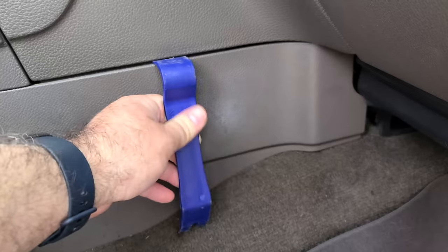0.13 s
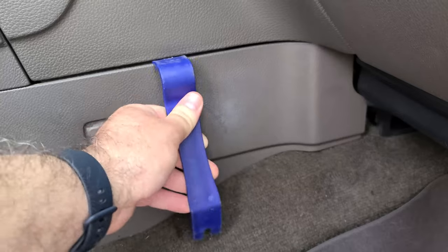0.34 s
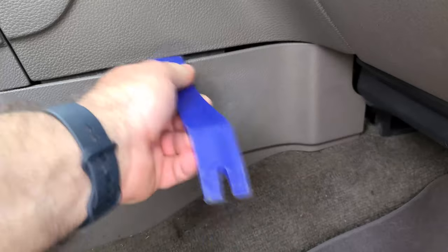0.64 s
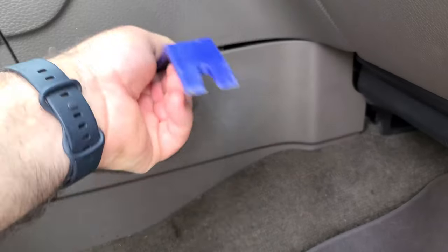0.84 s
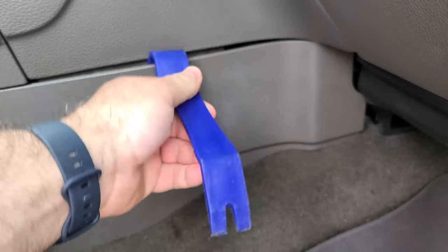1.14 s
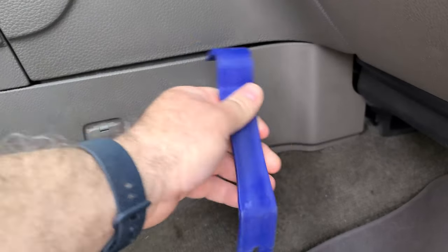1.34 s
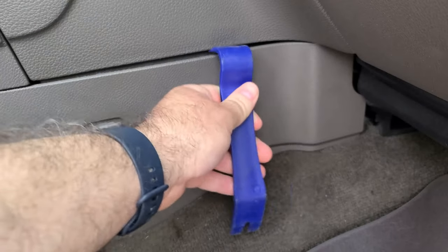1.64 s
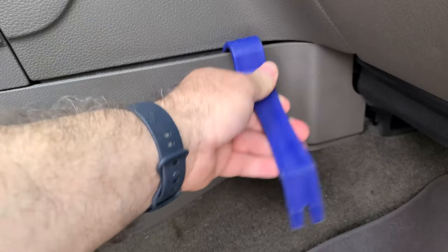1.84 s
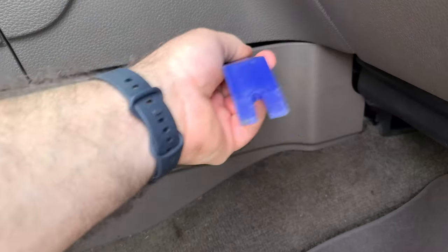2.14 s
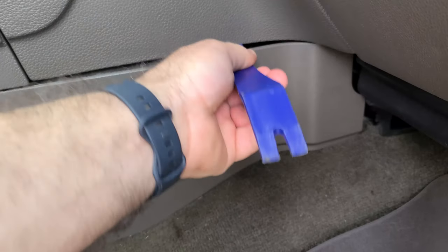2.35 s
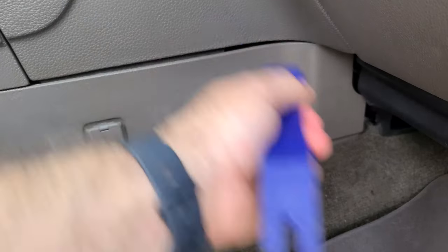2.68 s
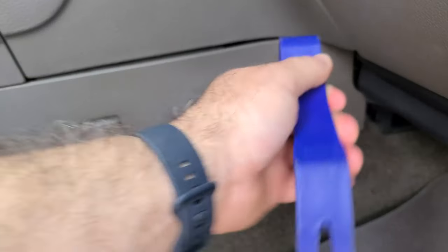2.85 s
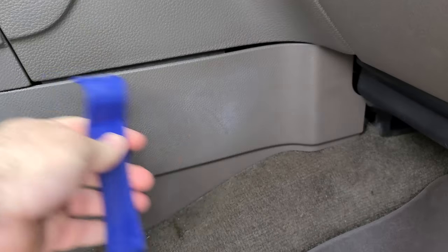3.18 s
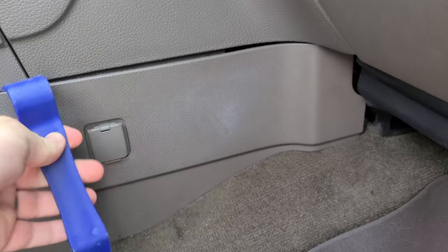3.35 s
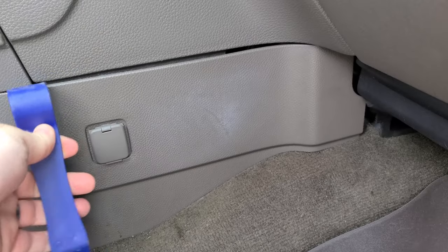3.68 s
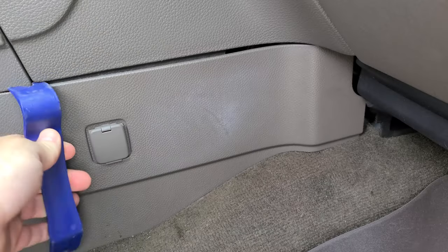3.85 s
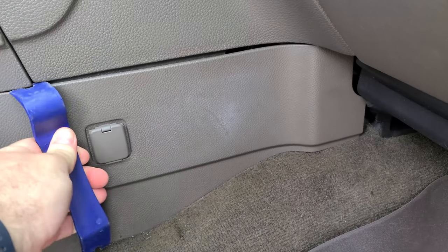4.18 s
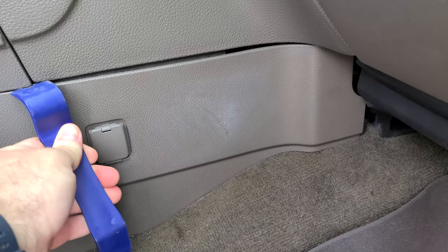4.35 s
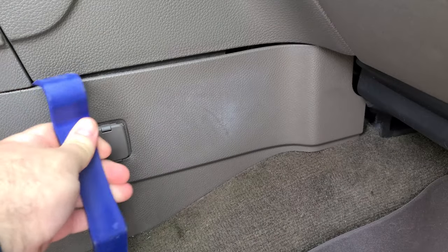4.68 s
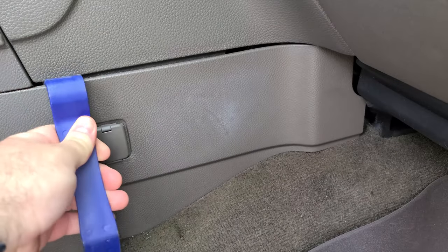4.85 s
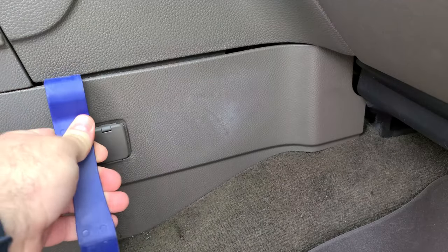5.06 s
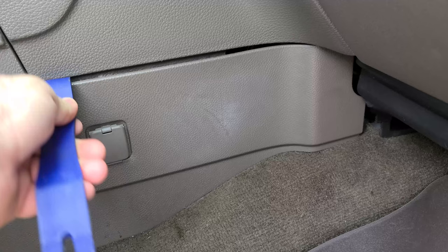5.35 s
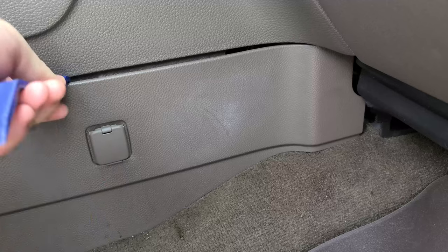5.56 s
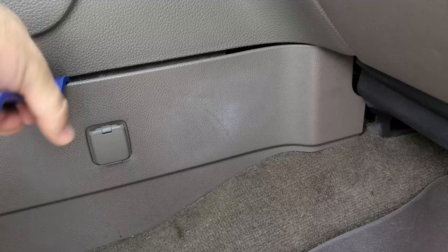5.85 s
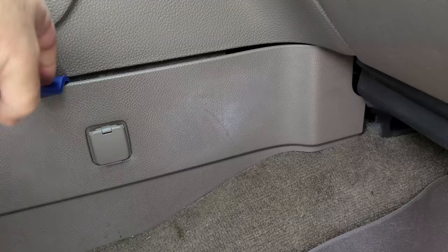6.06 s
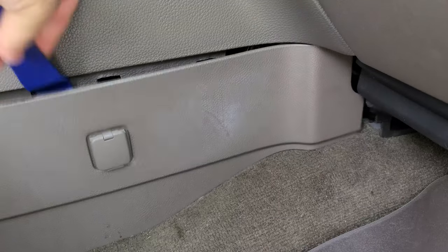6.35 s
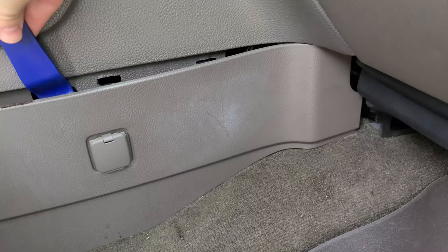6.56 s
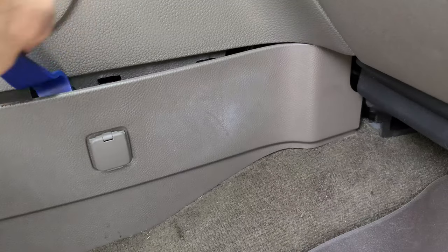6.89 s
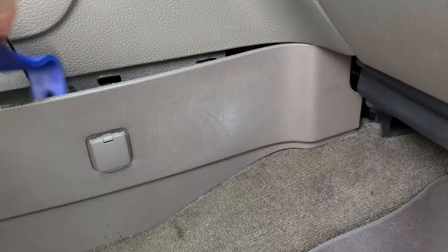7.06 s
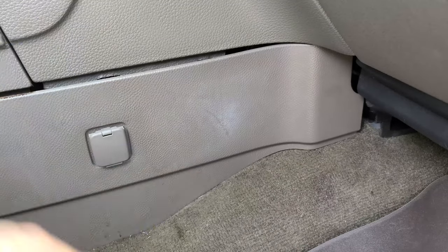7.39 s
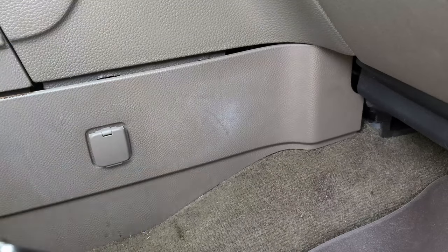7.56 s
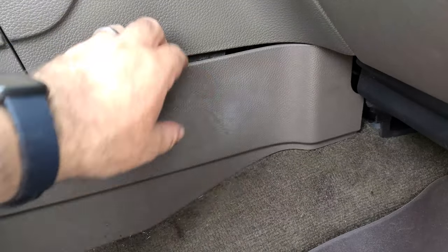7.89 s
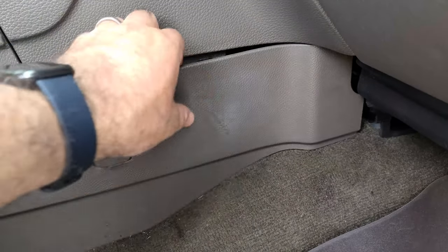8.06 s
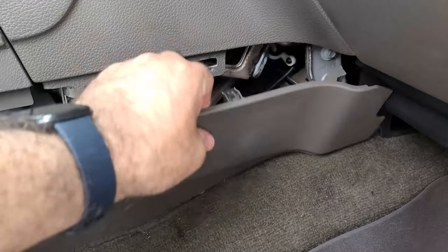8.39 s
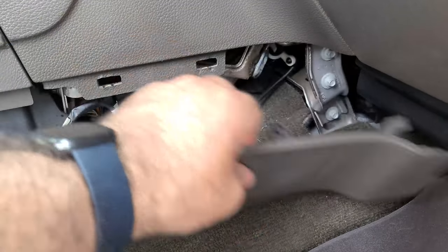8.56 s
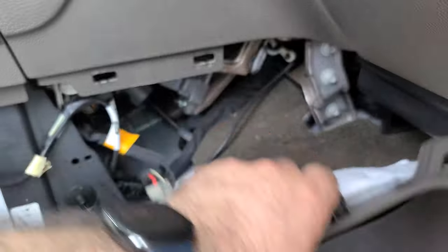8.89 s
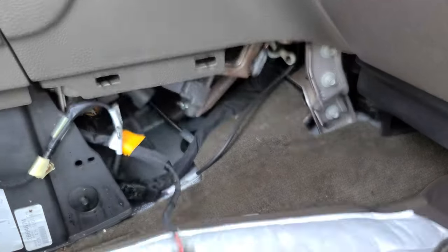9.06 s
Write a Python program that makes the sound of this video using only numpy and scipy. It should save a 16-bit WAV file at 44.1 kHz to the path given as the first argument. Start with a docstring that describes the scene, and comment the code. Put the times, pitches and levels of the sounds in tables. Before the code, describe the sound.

In a hushed parked car, a plastic tool prises a trim panel. Uneven snaps and crunches come with short creaks and dull low thumps, then nearly stop around three seconds. Light ticks follow, then heavier pops, a faint metallic ring, and a cluster of loud cracks as a hand pulls the panel off. Close stereo microphones, dry, with a very short cabin tail.

```python
"""A plastic lever works into the seam of a trim panel in a parked car, over a steady cabin hush (shaped noise).
First clips snap (clicks and grit ringing the panel modes); from 1 s the tip creaks too (near-regular slips).
After a lull near 3 s come lighter snaps, then heavier ones from 5.3 s, with two low creaks just after 6 s.
A steel clip rings faintly at 6.4 and 8.6 s (two close tones); the hardest snaps fall from 7.7 to 8.3 s.
Throughout, strokes scuff (clumped grit), pulls boom (noise-driven low modes), and the cabin adds a short tail."""
import sys
import numpy as np
from scipy import signal
from scipy.io import wavfile

SR = 44100
rng = np.random.default_rng(int(sys.argv[2]) if len(sys.argv) > 2 else 0)


def wav_out(sig):
    """Save sig, one row per channel (or a flat mono array), as 16-bit PCM at SR to the path in sys.argv[1]."""
    wavfile.write(sys.argv[1], SR, np.round(np.clip(np.atleast_2d(sig).T, -1, 1) * 32767).astype(np.int16))


N = 407043


def amp(db):
    """Turn decibels into a gain."""
    return 10 ** (np.asarray(db) / 20)


def rms_one(x):
    """Scale a signal to an rms of 1."""
    return x / np.sqrt(np.mean(x ** 2) + 1e-20)


def in_time(rows):
    """Draw each column of a table as a line over time, one value a sample."""
    s, *columns = np.transpose(rows)
    return [np.interp(np.arange(N) / SR, s, c) for c in columns]


def at_hz(points, hz):
    """Read a spectrum between its points, on a log frequency axis."""
    point_hz, values = np.array(points)[:, 0], np.array(points)[:, 1]
    return np.interp(np.log(hz), np.log(point_hz), values)


def cut(x, hz, kind, order=2):
    """Filter with a smooth (Butterworth) slope."""
    return signal.sosfilt(signal.butter(order, hz, kind, fs=SR, output="sos"), x)


def drift(rate):
    """Slow random wandering of rms 1: noise smoothed by two equal poles at `rate` Hz."""
    r = np.exp(-80 * np.pi * rate / SR)
    noise = rng.standard_normal(N // 40 + 2002)     # one value per 40 samples
    slow = signal.lfilter([1], [1, -2 * r, r * r], noise)[2000:]
    return np.interp(np.arange(N) / 40, np.arange(len(slow)), rms_one(slow))


def ring(force, hz, t60):
    """A mode: a unit click sets off a sine of height 1 that falls 60 dB in t60 seconds."""
    r, w = amp(-60 / (t60 * SR)), 2 * np.pi * hz / SR
    return signal.lfilter([0, np.sin(w)], [1, -2 * r * np.cos(w), r * r], force + 1e-18)


WANDER, WANDER_PER_S = .04, 5   # rms share by which a mode's pitch shifts, rate in Hz


def ring_bent(force, hz, t60, size=1024):
    """A mode whose pitch wanders as the panel bends, rung block by block."""
    r = amp(-60 / (t60 * SR))
    w = 2 * np.pi * hz * (1 + WANDER * drift(WANDER_PER_S)[::size]) / SR
    out, state = np.empty_like(force), np.zeros((len(force), 2))
    for k, i in enumerate(range(0, N, size)):
        poles = [1, -2 * r * np.cos(w[k]), r * r]
        block = force[:, i:i + size] + 1e-18
        out[:, i:i + size], state = signal.lfilter([0, np.sin(w[k])], poles, block, zi=state)
    return out


def grit(per_s, spread_db):
    """Tiny contacts at random moments, of uneven size and either sign; rms 1."""
    sizes = amp(spread_db * np.minimum(rng.exponential(1, N), 4)) * rng.choice([-1, 1], N)
    return rms_one(sizes * (rng.random(N) < per_s / SR))


def swells(rows, rise_db_per_s, fall_db_per_s):
    """Gestures that climb to a peak and fall away at steady dB rates; one gain per level column."""
    s, *columns = np.transpose(rows)
    late = np.arange(0, N + 40, 40) / SR - s[:, None]     # seconds after each peak, every 40 samples
    shape_db = np.where(late < 0, rise_db_per_s, -fall_db_per_s) * late
    return [np.repeat(amp(shape_db + c[:, None]).sum(axis=0), 40)[:N] for c in columns]


# colour of the cabin hush: (f/Hz, relative level/dB per Hz)
AIR = [(25, -1), (108, -3), (277, -25.5), (394, -14), (734, -32), (1330, -26.5), (1560, -29.5), (7310, -46),
       (16000, -46)]
# how alike the hush is on the two sides: (f/Hz, likeness, 1 = the same)
LIKENESS = [(240, 0.54), (950, 0.11), (3770, 0.55)]
AIR_DB = -53.5   # rms of the whole hush


def air():
    """Cabin hush: half-octave bands of stereo noise, each with its own level, flicker and likeness."""
    out, edges = 0, 22 * 2 ** np.arange(0, 9.8, .5)
    white = rng.standard_normal((2, 2, N))
    for k, (low, high) in enumerate(zip(edges, edges[1:])):
        mid, side = cut(white[k % 2], [low, high], "band")
        hz = np.sqrt(low * high)
        alike = np.clip(at_hz(LIKENESS, hz), -1, 1)
        gain = amp(at_hz(AIR, hz) + 0.82 * drift(4.0))
        out = out + gain * (np.sqrt(1 + alike) * mid + np.sqrt(1 - alike) * side * [[1], [-1]])
    return amp(AIR_DB) * rms_one(out)


CABIN_T60_S, CABIN_DB, SEAT_CUT_HZ = 0.067, -8, 6800


def cabin(x):
    """Glass and seats return a short dull tail, a different one to each microphone."""
    t = np.arange(int(.25 * SR)) / SR
    noise = cut(rng.standard_normal((2, len(t))), [400, SEAT_CUT_HZ], "band", order=1)
    tail = noise * amp(-60 * t / CABIN_T60_S)
    tail /= np.sqrt(np.sum(tail ** 2, axis=1, keepdims=True))
    return amp(CABIN_DB) * signal.oaconvolve(x, tail, axes=1)[:, :N]


# the panel as a drum over its cavity: (f/Hz, relative level/dB, time to fall 60 dB/s)
BOOM = [(68.7, 5.5, 0.26), (78, 0.5, 0.23), (91.7, -1.5, 0.25), (107.24, -1, 0.31), (136, -6, 0.047)]
# pulls that bend the whole panel: (t/s of the peak, level/dB before a slow flutter)
PULLS = [(0.03, -23.5), (0.72, -27), (1.18, -30.5), (2.2, -24.5), (2.62, -24.5), (3.66, -43), (4.87, -32),
         (5.29, -23), (5.75, -30.5), (6.3, -20.5), (7.12, -24), (8.12, -29.5), (8.3, -19.5), (8.48, -31.5),
         (9.23, -47)]
PULL_RISE_DB_PER_S, PULL_FALL_DB_PER_S, REST_DB = 88.5, 123, -54


def boom(jumps):
    """Sudden jumps and slow bending make the panel and its cavity sound their low modes."""
    bending = 0
    for hz, level_db, t60 in BOOM:
        bending = bending + amp(level_db) * rms_one(ring(rng.standard_normal(N), hz, t60))
    pull = swells(PULLS, PULL_RISE_DB_PER_S, PULL_FALL_DB_PER_S)[0] + amp(REST_DB)
    out = pull * amp(2.0 * drift(11.0)) * rms_one(bending)
    soft = cut(jumps, 130, "low")
    for hz, level_db, t60 in BOOM:
        out = out + ring(soft * amp(level_db + 2 * drift(5)), hz, t60)
    return out * amp([[-.4], [.4]])


# moments when the steel spring clip is set free: (t/s, level/dB before a fixed trim)
SPRING = [(6.371, -39), (8.61, -40.5)]
SPRING_HZ, SPRING_T60_S = (1206, 1216.5), .8


def spring():
    """The freed clip rings on two close tones that beat."""
    kicks = np.zeros(N)
    for s, level_db in SPRING:
        kicks[round(s * SR)] = amp(level_db - 11.5)
    return sum(ring(kicks, hz, SPRING_T60_S) for hz in SPRING_HZ) * amp([[1.5], [-1.5]])


# strokes of fingers and lever over grained plastic: (t/s of the peak, body level/dB, treble level/dB)
STROKES = [(0.04, -55.5, -53.5), (0.45, -68.5, -68), (2.02, -39, -43), (2.27, -68, -68), (2.54, -58.5, -82),
           (3.84, -70.5, -92.5), (4.05, -73, -59.5), (5.93, -77.5, -57.5), (6.25, -54.5, -57),
           (7.0, -63, -59), (7.92, -63, -72), (8.17, -62.5, -54), (8.46, -61, -51), (8.84, -72.5, -61.5),
           (9.23, -62.5, -52)]
STROKE_RISE_DB_PER_S, STROKE_FALL_DB_PER_S = 123.5, 173
LIFTED_DB = -89.5   # body level left between strokes


def rub_forces():
    """Rubbing is grit that comes in clumps, with lone ticks among it: body and treble drive."""
    level, treble = swells(STROKES, STROKE_RISE_DB_PER_S, STROKE_FALL_DB_PER_S)
    contacts = grit(2500.0, spread_db=3.0) + .4 * grit(60.0, spread_db=3.0)
    force = contacts * amp(5.5 * drift(16))
    return (level + amp(LIFTED_DB)) * force, treble * force


# creaks of the lever tip: (start t/s, length/s, slips per s at the start, middle and end,
# peak as a share of the length, body level/dB, treble level/dB, upper limit f/Hz,
# grit relative to the slips, extra bite above 1.4 kHz relative to the slips)
CREAKS = [(1.062, 0.045, 150, 140, 150, 0.5, -48, -58, 3500, .15, 0.2),
          (1.814, 0.043, 76, 80, 90, 0.9, -52.5, -55, 2500, .09, 0.45),
          (1.861, 0.066, 138, 134, 130, 0.36, -47.5, -50, 3000, .12, 0.15),
          (1.934, 0.041, 255, 275, 295, 0.7, -46, -56, 5000, .02, 1.0),
          (1.9755, 0.051, 250, 277, 252, 0.6, -43, -56, 6500, .02, 1.34),
          (2.029, .072, 66, 72, 90, 0.64, -42.5, -44.5, 6700, .09, 1.66),
          (2.459, .058, 232, 260, 288, 0.35, -40, -56, 6600, .02, 0.9),
          (6.1195, 0.049, 120, 152, 108, 0.53, -43.5, -48, 1600, .05, .1) , (6.19, 0.058, 96, 105, 80, 0.7, -42.5, -47, 1600, .05, 0.084)]
CREAK_START_DB, CREAK_END_DB = -6, -5.5   # a creak swells to its peak, then eases


def creak_forces():
    """Stick and slip: near-regular clicks, each with a puff of grit; also marks when the tip grips."""
    t = np.arange(N) / SR
    body, treble, gripping = np.zeros((3, N))
    wobble, sizes = .6 * drift(60), amp(1.3 * rng.standard_normal(N))
    puffs = grit(6000, spread_db=3.5)
    for (s, length, first, middle, last, peak,
         level_db, treble_db, edge_hz, gritty, bite) in CREAKS:
        done = (t - s) / length
        per_s = np.interp(done, [0, .5, 1], [first, middle, last])
        peak_at = np.clip(peak, .1, .9)
        swell = amp(np.interp(done, [0, peak_at, 1], [CREAK_START_DB, 0, CREAK_END_DB]))
        on = (done >= 0) & (done < 1)
        # count up the slips: each whole step is one click
        count = np.cumsum(on * per_s * (1 + gritty * wobble) / SR)
        slips = np.diff(np.ceil(count), prepend=0) * sizes * np.sqrt(SR / per_s)
        puff = puffs * signal.lfilter([1], [1, -amp(-60 / (.02 * SR))], slips + 1e-18)
        force = cut(slips + gritty * puff, edge_hz, "low", order=5)
        body += amp(level_db) * swell * (force + bite * cut(force, 1400, "high"))
        treble += amp(treble_db) * swell * (0.13 * slips + 0.12 * puff)
        gripping += on
    return body, treble, gripping


# the lever's own modes: (f/Hz, level/dB, time to fall 60 dB/s)
LEVER = [(768, -2, 0.034), (1664, -11.5, 0.016), (2745, -14, 0.014), (4010, -15.5, 0.0061),
         (5600, -35.5, 0.003)]


def lever(slips):
    """The creaking tip rings the lever itself, heard a moment later on the right."""
    out = sum(amp(level_db) * ring(slips, hz, t60) for hz, level_db, t60 in LEVER)
    return np.array([out, np.roll(out, 8)])     # 8 samples late


DULL_BELOW_DB, DULL_HZ = -40.5, 4936   # snaps at or below this level lose their top


def crackle(force, count=9):
    """Nearby surfaces scatter the bright edge of contacts differently from each spot to each side."""
    t, out = np.arange(int(.03 * SR)) / SR, 0
    spot = (contact_spot() + np.arange(N) // 900) % count     # also moves on every 900 samples
    snap_db = np.array([SNAPS[0]] + list(SNAPS))[:, 1]
    hard = np.clip((snap_db - DULL_BELOW_DB) / 20, 0, 1)[contact_spot()]
    force = hard * force + (1 - hard) * 2.94 * cut(force, DULL_HZ, "low", order=1)
    for k in range(count):
        scatter = rng.standard_normal((2, len(t))) * amp(-60 * t / .014)
        scatter /= np.sqrt(np.sum(scatter ** 2, axis=1, keepdims=True))
        out = out + signal.oaconvolve((force * (spot == k))[None], scatter, axes=1)[:, :N]
    return cut(out, 2600, "high") * amp([[1.8], [-1.8]])


# snaps and knocks, levels before fixed trims: (t/s, level/dB, crunch length/s with a floor of 1 ms,
# treble level/dB relative to level, boom level/dB)
SNAPS = [(0.037, -29.5, 0.009, -39, -28), (0.116, -43, 0.0015, -30, -28.5), (0.303, -41.5, 0.01, -30, -36),
         (0.536, -31, 0.014, -26, -26), (0.56, -21.5, 0.0021, -14.5, -6.5),
         (0.569, -24.5, 0.036, -27.5, -11), (0.604, -25, 0.012, -36, -11.5), (0.643, -28, 0.0089, -12, -9),
         (0.663, -29, 0.0061, -64, -16), (0.703, -32, 0.027, -30.5, -32), (0.817, -27, 0.0074, -28.5, -30),
         (0.868, -32.5, 0.0076, -25, -21.5), (0.907, -28.5, 0.019, -27.5, -46),
         (0.938, -31.5, 0.0043, -19.5, -22), (1.023, -26.5, 0.0086, -25.5, -18.5),
         (1.054, -28.5, 0.0076, -28.5, -36), (1.129, -30.5, 0.021, -22.5, -20.5),
         (1.156, -33, 0.0051, -48, -27), (1.199, -21, 0.0079, -16, -6), (1.568, -37.5, 0.0097, -74, -26),
         (1.627, -32.5, 0.016, -64, -39), (1.65, -38, 0.0057, -25, -17.5), (1.737, -36, 0.017, -35, -29.5),
         (2.111, -32.5, 0.026, -33, -20), (2.133, -33, 0.013, -35, -21), (2.164, -24.5, 0.012, -35, -14),
         (2.232, -33.5, 0.0031, -43, -32), (2.26, -26, 0.02, -28, -21), (2.36, -38.5, 0.0025, -37, -32),
         (2.379, -24.5, 0.009, -35.5, -26.5), (2.527, -25, 0.0033, -24, -20.5),
         (2.613, -35, 0.057, -23.5, -17), (2.633, -15.5, 0.0085, -9, -8.5),
         (2.642, -33.5, 0.0098, -12, -3.5), (2.889, -60, 0.0028, -10.5, -36.5),
         (3.592, -45, 0.013, -30, -47), (3.619, -39, 0.0051, -13, -21.5), (3.704, -41, 0.0074, -27, -24.5),
         (3.802, -51, 0.024, -45, -24.5), (3.84, -46.5, 0.0054, -29, -26), (3.887, -51, 0.019, -10, -58),
         (3.967, -36.5, 0.0062, -14.5, -26), (4.016, -43.5, 0.0031, -15, -44),
         (4.056, -34, 0.0034, -20.5, -42), (4.133, -46, 0.0054, -23, -29), (4.156, -39, 0.017, -26, -17.5),
         (4.336, -57, 0.0034, -24, -28), (4.356, -34.5, 0.0031, -14.5, -25),
         (4.524, -45.5, 0.0031, -16.5, -45), (4.642, -51, 0.004, -26, -26), (4.655, -41, 0.0082, -27, -24),
         (4.775, -31, 0.0034, -69, -25), (4.84, -38, 0.023, -56, -30), (4.863, -29, 0.0057, -23.5, -18.5),
         (4.919, -51, 0.0046, -21, -40), (4.939, -47.5, 0.0044, -17, -51), (4.958, -34, 0.01, -23, -34.5),
         (5.075, -53.5, 0.0026, -17.5, -49), (5.099, -50, 0.0044, -19, -48),
         (5.116, -33.5, 0.004, -20.5, -37), (5.154, -38, 0.0037, -23, -44),
         (5.167, -40.5, 0.0053, -28, -30), (5.217, -45.5, 0.0039, -24, -23.5),
         (5.317, -19, 0.014, -32, -17.5), (5.327, -23, 0.0049, -6, -2.5), (5.616, -35.5, 0.0096, -40, -23),
         (5.642, -40.5, 0.0042, -31.5, -47), (5.674, -35, 0.019, -62, -26),
         (5.695, -49, 0.0078, -12.5, -30), (5.842, -42.5, 0.019, -51.5, -37),
         (5.91, -41, 0.023, -29, -29.5), (6.082, -28.5, 0.0092, -46, -37),
         (6.101, -26, 0.005, -21.5, -16.5), (6.177, -28.5, 0.0037, -16, -31),
         (6.255, -24, 0.0054, -22, -25), (6.283, -23, 0.0025, -26.5, -33), (6.318, -25, 0.0027, -24, -26),
         (6.363, -14.5, 0.01, -25.5, -11.5), (6.371, -15.5, 0.024, -18, -4.5),
         (6.408, -30, 0.0014, -35, -2), (6.422, -30, 0.0092, -15, -12), (6.444, -36.5, 0.006, -13, -11.5),
         (6.602, -35, 0.0039, -5.5, -26), (6.621, -36, 0.013, -30.5, -24.5), (6.659, -43, 0.034, -22, -27),
         (6.78, -34.5, 0.0069, -53, -25), (6.869, -45.5, 0.019, -18.5, -58),
         (6.918, -42, 0.0073, -18, -31.5), (7.042, -30, 0.0054, -13, -14.5),
         (7.133, -21.5, 0.0099, -18.5, -5.5), (7.145, -24, 0.0075, -12.5, -7.5),
         (7.156, -15.5, 0.0092, -28.5, -4), (7.739, -12, 0.004, -41, -36),
         (7.755, -14.5, 0.0054, -27.5, -17), (7.766, -13.5, 0.0027, -33, -22),
         (7.809, -25, 0.0022, -33, -38), (7.837, -26, 0.0022, -29, -47), (7.868, -22.5, 0.0031, -29, -20),
         (7.888, -26.5, 0.0034, -37, -48), (7.913, -37, 0.0024, -46, -27.5), (7.931, -35, 0.02, -32, -39),
         (7.979, -35, 0.0019, -37, -52), (8.017, -27.5, 0.015, -50, -27), (8.054, -40, 0.0064, -28, -47),
         (8.098, -36, 0.0062, -20, -27), (8.209, -25.5, 0.011, -35, -8.5), (8.275, -12.5, 0.021, -15, -13),
         (8.355, -26, 0.02, -21.5, -10), (8.502, -26.5, 0.012, -35, -12.5),
         (8.525, -24, 0.0053, -17.5, -19), (8.539, -28, 0.021, -21.5, -19), (8.581, -33, 0.013, -16, -50),
         (8.611, -23, 0.0068, -20, -22), (8.801, -37, 0.0066, -24, -27.5), (8.823, -42, 0.032, -17, -71),
         (8.93, -41.5, 0.016, -19, -59), (9.025, -32.5, 0.0039, -31, -30), (9.059, -43.5, 0.018, -35, -36),
         (9.188, -27.5, 0.0031, -35, -30), (9.19, -35.5, 0.0022, -27.5, -50),
         (9.2, -26, 0.0073, -44, -19.5)]
CLICK_S = 1.87   # the first click weighs as the root of this over the crunch length
# a short noise swell ahead of each click climbs 60 dB, up to SWELL_DB,
# in SWELL_S plus so many crunch lengths
SWELL_S, SWELL_PER_HOLD, SWELL_DB = 0.015, 3.2, -12.5


def snap_forces():
    """A short noise swell, a click, then a crunch of small contacts that die: body, treble, boom drive."""
    body, treble, boom_drive = np.zeros((3, N))
    crunch = grit(1800.0, spread_db=3.0)
    for s, level_db, hold, treble_db, boom_db in SNAPS:
        at, hold = round(s * SR), max(hold, .001)
        swell_s = SWELL_S + SWELL_PER_HOLD * hold
        lead = min(int(swell_s * SR), at)
        span = np.arange(at - lead, min(at + int((hold + 0.023) * SR), N))
        t = (span - at) / SR
        fade = amp(-60 * np.maximum(t - hold, 0) / (0.026 + hold))
        shape = np.minimum(1, 0.46 + 3 * t / hold) * fade
        shape[:lead] = amp(SWELL_DB + 60 * t[:lead] / swell_s)
        burst = crunch[span] * shape
        click = (span == at) * np.sqrt(CLICK_S / hold)     # short snaps are mostly click
        body[span] += amp(level_db - 18.0) * (burst + click)
        treble[span] += amp(level_db + treble_db + 4.5) * (burst + .45 * click)
        middle = min(at + int(hold * SR / 2), N - 1)
        boom_drive[middle] -= amp(boom_db - 12.0)     # the panel jumps inward
    return body, treble, boom_drive


def contact_spot():
    """Count the snaps so far at every sample: each snap moves the contact to a new spot."""
    return np.searchsorted(np.array(SNAPS)[:, 0] * SR, np.arange(N) + 1)


# panel modes: (f/Hz, level/dB before each spot's changes, time to fall 60 dB/s)
PANEL = [(177, -0.5, 0.033), (294, 1.5, 0.018), (393, -3.5, 0.05), (513, -1, 0.015), (583, -4.5, 0.034),
         (705, -6.5, 0.027), (970, -9.5, 0.015), (1008, -5, 0.014), (1243, -3, 0.0072), (1404, -4, 0.011),
         (1683, -4.5, 0.0066), (1779, -6, 0.011), (2160, -9, 0.0068), (2375, -10, 0.0099),
         (2694, -6.5, 0.0055), (3230, -8.5, 0.004), (3900, -9.5, 0.0039), (4520, -11.5, 0.0037),
         (5510, -8.5, 0.0013)]
# snaps where one group of panel modes rings out: (t/s of the snap, centre f/Hz, lift level/dB)
PITCHED = [(.115, 3000, 18), (.643, 5360, 5.5), (1.196, 800, 9), (2.888, 1730, 12.5), (3.966, 1240, 10),
           (4.056, 380, 11.5), (4.357, 1270, 10.5), (4.774, 690, 7.5), (8.212, 245, 5), (8.503, 885, 7.5),
           (8.526, 1390, 6.5), (8.58, 1190, 8.5), (8.609, 810, 6.5), (8.8, 1860, 13), (8.821, 1330, 15),
           (8.932, 1950, 12), (9.187, 710, 14), (9.194, 2470, 14), (7.752, 909, 9.5)]
# where the work goes on: (t/s, left minus right level/dB)
PLACE = [(0.0, 1), (7.38, 0.5), (9.23, -1.5)]
LEAN_DB_PER_OCTAVE = 1.3   # high modes lean left, middle ones right


def panel(blows, friction):
    """Contacts ring the panel modes, with new strengths at each spot and the sides less alike higher up."""
    spot = contact_spot()
    s, snap_db, _, treble_db, boom_db = np.transpose([SNAPS[0]] + list(SNAPS))
    # snaps with little boom sound hollow, near 1 kHz unless they have a pitch of their own
    centre_hz, lift_db = np.full(len(s), 1080.), .5 * np.clip(snap_db - boom_db, 0, 16)
    for when, own_hz, own_db in PITCHED:
        k = np.argmin(abs(s - when))
        centre_hz[k], lift_db[k] = own_hz, own_db
    chance = rng.standard_normal((len(SNAPS) + 1, len(PANEL), 2))
    out = np.zeros((2, N))
    for k, (hz, level_db, t60) in enumerate(PANEL):
        # bright snaps reach the high modes, boomy ones the low modes
        hard_db = 0.23 * (treble_db + 21.0) * max(np.log2(hz / 700), 0)
        heavy_db = 0.46 * np.clip(boom_db - snap_db - 9.5, -20, 20) * max(np.log2(600 / hz), 0)
        hollow_db = lift_db * np.exp(-(np.log2(hz / centre_hz) / .45) ** 2)
        strength = amp(level_db + hard_db + 2 * chance[:, k, 0])[spot]
        mid = strength * (amp(hollow_db + heavy_db)[spot] * blows + friction)
        unlike = 0.76 * hz ** 2 / (hz ** 2 + 1070.0 ** 2)
        side = mid * unlike * np.sign(chance[spot, k, 1])
        both = ring_bent(np.array([mid, side]), hz, t60) * (-1) ** k / np.sqrt(1 + unlike ** 2)
        # a quarter cycle late: the sides differ in phase, not level
        lagged = np.roll(both[1], round(SR / hz / 4))
        lean_db = np.clip(LEAN_DB_PER_OCTAVE * np.log2(hz / 1800), -1, 1.6) * min(hz / 500, 1)
        out += amp([[lean_db], [-lean_db]]) * [both[0] + lagged, both[0] - lagged]
    pan_db = in_time(PLACE)[0]
    return out * amp(np.array([pan_db, -pan_db]) / 2)


def scene():
    """Panel, lever and crackle with their cabin tail, plus boom, spring and hush."""
    snap_body, snap_treble, jumps = snap_forces()
    creak_body, creak_treble, gripping = creak_forces()
    rub_body, rub_treble = rub_forces() * (1 - .8 * gripping)     # a gripping tip hardly scuffs
    friction = cut(creak_body, 360, "high", order=1) + rub_body
    bright = crackle(snap_treble + creak_treble + rub_treble)
    near = panel(snap_body, friction) + lever(creak_body) + bright
    return near + cabin(near) + boom(jumps) + spring() + air()


MIC_LOW_HZ, CUTOFF_HZ = 40.7, 16700


def record(dry):
    """Two small microphones lose the deepest bass; peaks are rounded at full scale, the top is cut."""
    heard = cut(dry, MIC_LOW_HZ, "high", order=3)
    rounded = heard / (1 + heard ** 4) ** .25
    top_cut = signal.cheby2(12, 70, CUTOFF_HZ, fs=SR, output="sos")
    return .98 * signal.sosfilt(top_cut, rounded)


dry = scene()
out = record(dry)
wav_out(out)
```